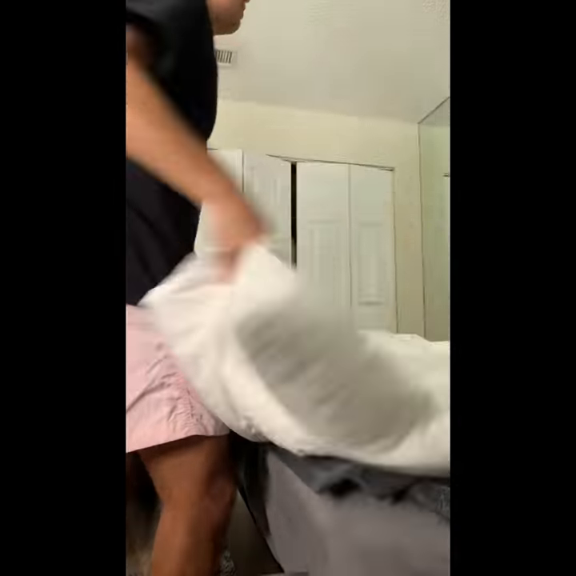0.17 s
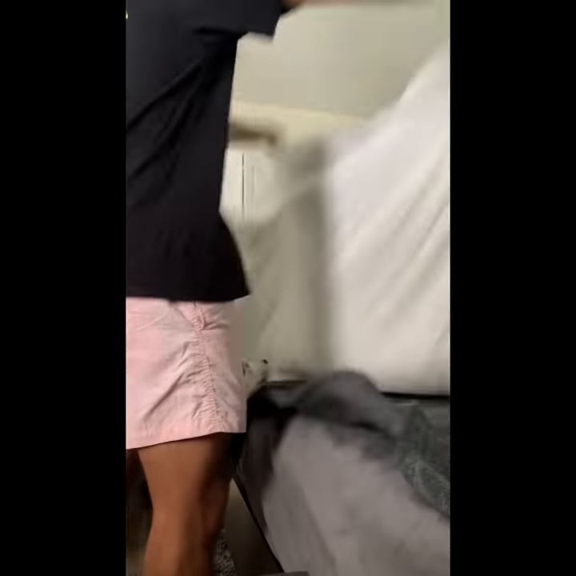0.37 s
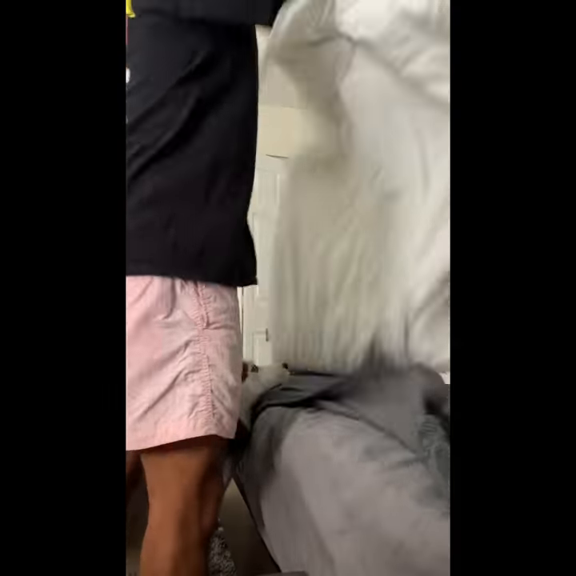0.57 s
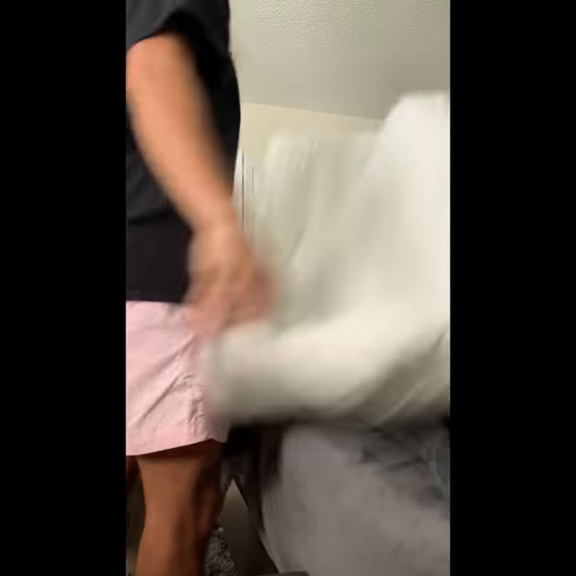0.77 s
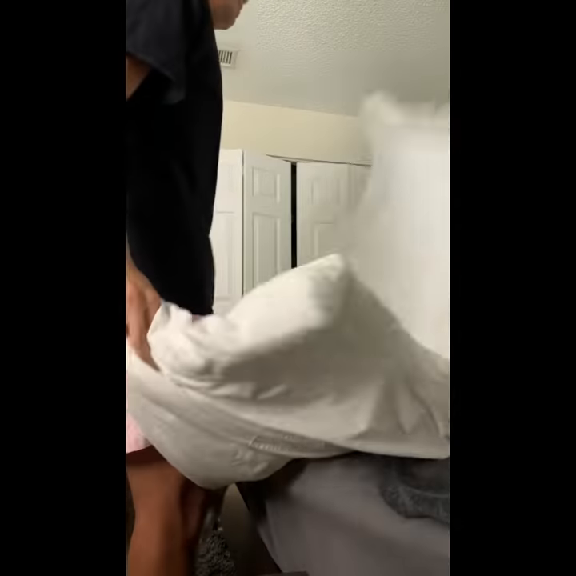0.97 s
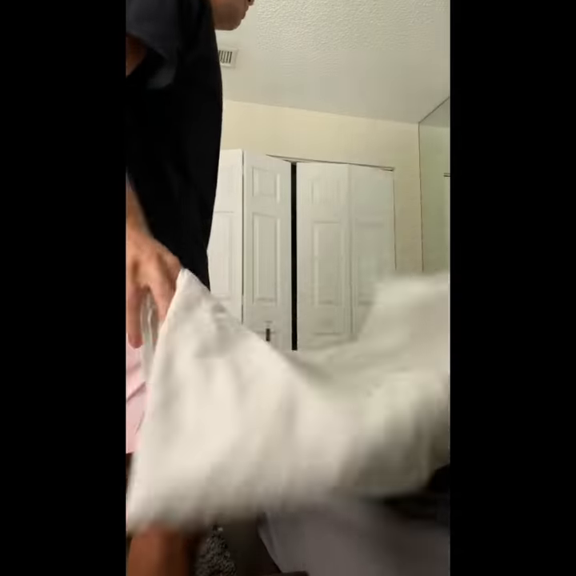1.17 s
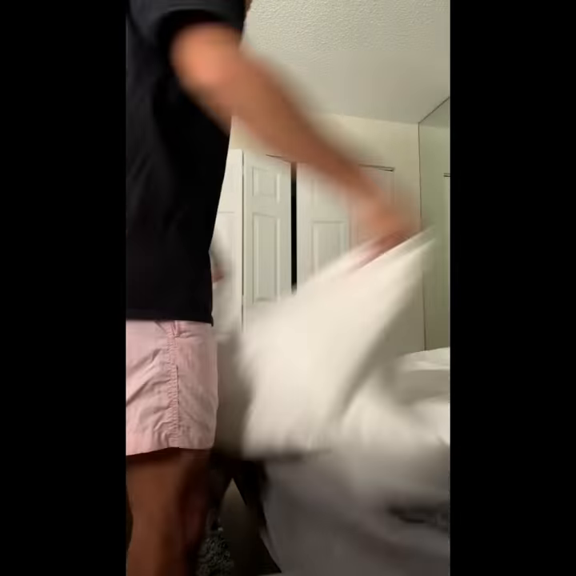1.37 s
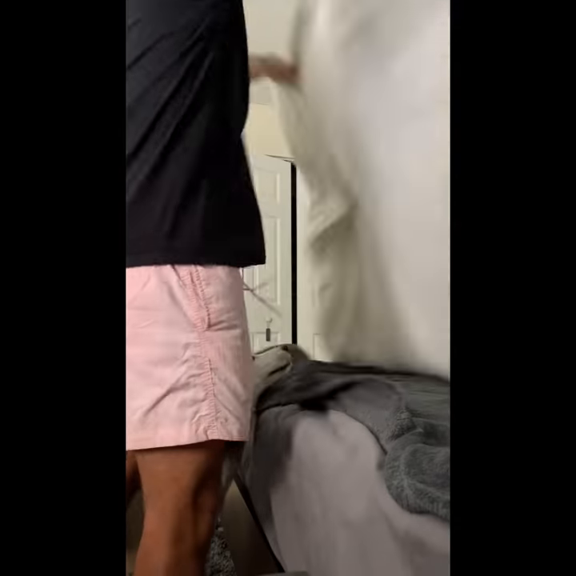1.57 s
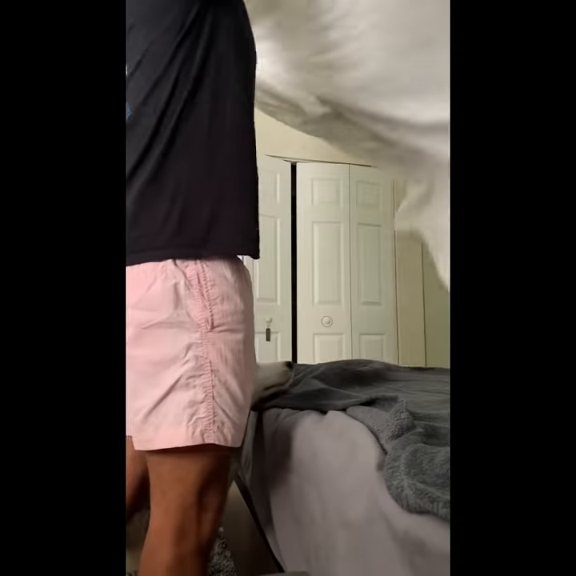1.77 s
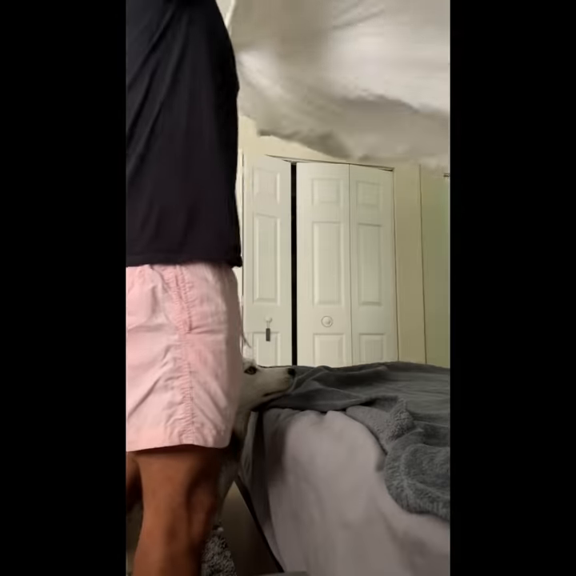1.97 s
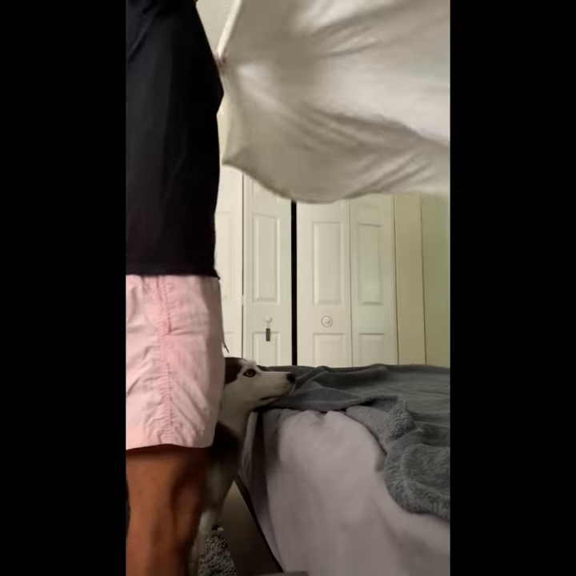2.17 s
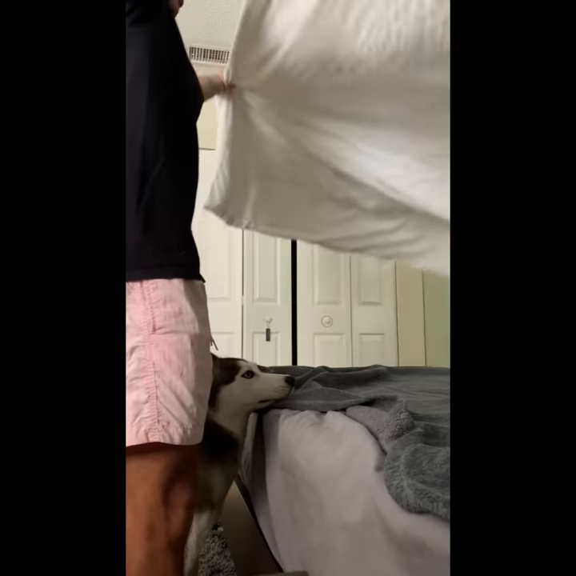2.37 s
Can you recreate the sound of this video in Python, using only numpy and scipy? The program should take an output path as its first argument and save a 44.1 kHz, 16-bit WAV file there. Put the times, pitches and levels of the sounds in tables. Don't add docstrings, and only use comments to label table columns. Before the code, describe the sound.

A heavy blanket is shaken out over a bed, flapping and thumping softly in a small bedroom

```python
import sys
import numpy as np
from scipy import signal
from scipy.fft import rfft, irfft
from scipy.io import wavfile
from scipy.ndimage import uniform_filter1d

SR = 44100
rng = np.random.default_rng(int(sys.argv[2]) if len(sys.argv) > 2 else 0)


def unload_audio(sound):
    columns = np.transpose(np.atleast_2d(sound))
    steps = np.round(np.clip(columns, -1, 1) * 32767)
    wavfile.write(sys.argv[1], SR, steps.astype(np.int16))


def field_ratio(decibels):
    return 10 ** (np.asarray(decibels, dtype=float) / 20)


N = 105840
EDGE = 4096


def level(x, db):
    return x * field_ratio(db) / np.sqrt(np.mean(x ** 2))


def read(table, hz):
    table = np.array(table)
    return np.interp(np.log(hz + 1), np.log(table[:, 0]), table[:, 1])


def over_time(table, column=1):
    table = np.array(table)
    return np.interp(np.arange(N) / SR, table[:, 0], table[:, column])


def walk(rate):
    hold = int(SR / rate)
    steps = np.repeat(rng.standard_normal(N // hold + 1), hold)
    return 0.943 * uniform_filter1d(uniform_filter1d(steps, hold), hold)[:N]


def texture(x, table, flicker_db, rate):
    hz = np.fft.rfftfreq(N, 1 / SR)
    inside = (hz > table[0][0] * 0.7) * (hz < table[-1][0])
    spec = rfft(x) * field_ratio(read(table, hz)) * inside
    out = 0
    for centre_hz in 22 * 2 ** (np.arange(20) / 2):
        bell = np.clip(1 - 2 * abs(np.log2((hz + 1) / centre_hz)), 0, 1)
        out = out + irfft(spec * bell, N) * field_ratio(flicker_db * walk(rate))
    return level(out, 0)


def folds(rate, spread_db, share):
    chance = rng.random((3, N))
    size_db = -spread_db * np.log(chance[2] + 0.029)
    pops = (chance[0] < rate / SR) * np.sign(chance[1] - 0.5) * field_ratio(size_db)
    return share * level(pops, 0) + (1 - share) * rng.standard_normal(N)


def filtered(x, response):
    wide = np.pad(x, EDGE, "reflect")
    hz = np.fft.rfftfreq(len(wide), 1 / SR)
    return irfft(rfft(wide) * response(hz), len(wide))[..., EDGE:-EDGE]


# t/s, level/dB
HUM_SWELL = [
    (0, -37),
    (.6, -35),
    (1.25, -40),
    (1.9, -43),
    (2.04, -57),
    (2.14, -43.5),
    (2.28, -42.5),
    (2.4, -58),
]
# f/Hz, level/dB
ROOM_NOISE = [(30, -28), (60, 2), (110, -32), (230, -23), (480, -62), (900, -46), (2000, -56), (5000, -54),
              (15800, -41.5)]


def house():
    hum_hz = 58.9 * (1 + 0.0199 * walk(4.92))
    hum = np.sqrt(2) * np.sin(2 * np.pi * np.cumsum(hum_hz) / SR)
    hum_db = over_time(HUM_SWELL) + 1.5 * walk(7.9)
    noise = texture(rng.standard_normal(N), ROOM_NOISE, flicker_db=0.0, rate=6)
    return hum * field_ratio(hum_db) + level(noise, -57)


# t/s, level/dB, centre f/Hz, length/s
SCUFF_HITS = [(0.013, -56.5, 800, .01), (.04, -54, 850, 0.0073), (0.115, -58.5, 1680, 0.049),
              (.215, -47, 1800, .002), (0.225, -37, 686, 0.01), (0.287, -38, 600, 0.0055),
              (0.314, -39.5, 860, 0.0086), (0.363, -42, 614, 0.0049), (0.393, -51.5, 3430, 0.057),
              (0.401, -42, 1389, .008), (0.428, -48.5, 2000, 0.031), (0.564, -49, 1570, 0.02),
              (0.587, -27, 480, 0.0088), (.594, -32, 1435, 0.0026), (.603, -31.5, 1850, 0.0039),
              (.604, -44.5, 4560, 0.0062), (.61, -36, 1350, .004), (.612, -27.5, 800, 0.0035),
              (0.632, -34, 480, 0.053), (0.687, -32, 160, 0.022), (.748, -40.5, 1670, 0.015),
              (0.72, -35, 1134, 0.0046), (0.77, -38, 620, 0.0042), (.964, -48, 3300, 0.0023),
              (.965, -35.5, 1290, .0032), (1.176, -59, 4500, 0.0031), (1.257, -54, 900, .02),
              (1.327, -54.5, 6450, 0.03), (1.334, -41.5, 700, 0.006), (1.34, -50, 2700, .003),
              (1.356, -40.5, 1111, 0.019), (1.406, -42, 1790, 0.0017), (1.418, -41.5, 1890, 0.0026),
              (1.419, -48, 3700, .002), (1.42, -46.5, 1570, 0.044), (1.44, -41, 6700, 0.004),
              (1.444, -34, 694.4, 0.0062), (1.482, -41.5, 3760, 0.022), (1.511, -35, 695, .004),
              (1.514, -40, 1190, 0.0035), (1.528, -49, 3300, 0.03), (1.543, -33, 283, 0.024),
              (1.759, -54.5, 780, 0.011), (1.941, -43.5, 214, .044), (1.7, -58, 850, 0.058),
              (2.02, -61, 950, 0.062), (2.06, -68.5, 1728, .03), (2.284, -60, 900, 0.046),
              (2.293, -56, 302, 0.049)]


def scuffs():
    width, rise = 0.53, 0.66
    t, hz, out = np.arange(N) / SR, np.fft.rfftfreq(N, 1 / SR), np.zeros(N)
    noise = rfft(rng.standard_normal(N))
    for at, db, centre_hz, length in SCUFF_HITS:
        band = np.exp(-(np.log((hz + 1) / centre_hz) / width) ** 2)
        puff = irfft(noise * band, N)
        shape = np.exp(-((t - at) / length / np.where(t < at, rise, 1)) ** 2)
        even = np.sqrt(np.sum(shape ** 2) / np.sum((shape * puff) ** 2))
        out += field_ratio(db) * shape * puff * even
    return out


# t/s, peak level/dB, pitch f/Hz, length/cycles
THUMP_HITS = [(.168, -28.5, 610, 0.97), (.173, -28.5, 250, 1.74), (.214, -19.5, 740, 2.1),
              (.222, -24, 233, 1.9), (.434, -13, 98, 1.4), (0.436, -24, 55, 1.2), (0.461, -24, 200, 1.5),
              (.587, -19, 300, 4.2), (.6, -14, 270, 2.5), (.603, -15.5, 750, 2.4), (.607, -12, 306, 1.55),
              (.62, -22, 150, 1), (.64, -22.5, 450, 3), (.812, -19, 115, 0.88), (.842, -25, 100, 1.7),
              (.86, -23.5, 140, 2.4), (.861, -25, 50, 1.5), (.866, -20.5, 373, 3.2), (.891, -17, 178, 1.52),
              (.902, -22, 390, 2), (.93, -21.5, 101, 1.5), (0.949, -20, 130, 1.3), (.966, -15, 470, 1.6),
              (.976, -9, 100.7, 1.88), (1.012, -21.5, 100, 1.7), (1.059, -29, 540, 1.2),
              (1.074, -27.5, 520, 4.8), (1.088, -22, 90, 1.3), (1.106, -24.5, 113, 2.3),
              (1.172, -29, 100, 2), (1.212, -33.5, 200, 1.3), (1.407, -24, 900, 2.2),
              (1.414, -22.5, 114, 1.1), (1.444, -21.5, 102, 2.3), (1.47, -22, 130, 1.2),
              (1.491, -20.5, 71.5, 0.96), (1.531, -23, 105.6, 1.4), (1.615, -25, 150, 1.1),
              (1.664, -33.5, 107, 3.3), (1.758, -26.5, 195, 2.6), (1.922, -34.5, 128, 1.9),
              (1.954, -32, 98, 1.3), (2.13, -46, 130, 2.6), (2.382, -38.5, 290, 3), (2.392, -38, 110, 1.2)]


def thumps():
    sag, ring_out = 0.074, 1.39
    t, out = np.arange(N) / SR, np.zeros(N)
    for at, db, hz, cycles in THUMP_HITS:
        turns = (t - at) * hz
        near = abs(turns) < 3 * cycles
        u = turns[near]
        shape = np.exp(-(2.81 * u / cycles / np.where(u > 0, ring_out, 1)) ** 2)
        out[near] += field_ratio(db) * shape * np.cos(2 * np.pi * u * (1 - sag * u / cycles))
    return out


# t/s, flap level/dB, air push relative to flap/dB
SHAKE_MOVES = [(0, -59.5, 9.5), (.14, -53, 5), (.22, -39, 5), (.35, -36, 4), (0.431, -27.5, -1),
               (0.56, -44.5, 6), (0.604, -26, 3), (0.742, -38.5, -1.5), (0.823, -29, 4.5), (.97, -33.5, 7),
               (1.1, -39, 11), (1.309, -54, 7.5), (1.36, -37, 5), (1.49, -35.5, 7.5), (1.801, -56.5, 15.5),
               (2.08, -66.5, 13), (2.2, -74, 21), (2.4, -48, 4.5)]
# t/s, level/dB
SLIDE_MOVES = [(0, -63), (.13, -61.5), (.3, -52.5), (.42, -44.5), (.53, -59.5), (.61, -46.5), (.7, -50.5),
               (.97, -52), (1.02, -60), (1.3, -62), (1.35, -51.5), (1.41, -51.5), (1.51, -42.5),
               (1.74, -65), (2.08, -69), (2.13, -74.5), (2.24, -75.5), (2.28, -68)]
# f/Hz, level/dB
FLAP_COLOUR = [(88, -70), (150, -2), (395, -8.5), (438, -7.5), (579, -13.5), (721, -12), (912, -16),
               (3080, -39), (5000, -71.5), (6500, -92), (11000, -120)]
# f/Hz, level/dB
AIR_COLOUR = [(25, -34), (42, 1.5), (92, -1.5), (124, -2.5), (168, -17), (194, -15), (227, -9.5),
              (300, -16), (390, -40), (660, -120)]
# f/Hz, level/dB
SLIDE_COLOUR = [(600, 5.5), (1700, 6), (4300, 1.5), (7300, -5.5), (8800, -8), (11100, -9), (13300, -9.5),
                (15800, -7.5)]


def blanket():
    flap_db, air_db = over_time(SHAKE_MOVES, 1), over_time(SHAKE_MOVES, 2)
    slide_db = over_time(SLIDE_MOVES)
    gust = walk(21.99)
    flap = texture(folds(700, 2, 0.52), FLAP_COLOUR, flicker_db=1.8, rate=26)
    air = texture(folds(60, 0.92, 0.35), AIR_COLOUR, flicker_db=3.0, rate=14.07)
    slide = texture(folds(3000, 1.9, 0.44), SLIDE_COLOUR, flicker_db=-0.5, rate=12.87)
    sheen = signal.sosfilt(signal.butter(2, 6950, "high", fs=SR, output="sos"), slide)
    slide = slide + sheen * field_ratio(-3.5 + 2 * (slide_db + 45.5))
    shaken = flap * field_ratio(1.5 + 1.04 * gust) + air * field_ratio(-1.5 + air_db + 0.36 * gust)
    return field_ratio(flap_db) * shaken + slide * field_ratio(4.5 + slide_db + 1.7 * gust)


# f/Hz, width/Hz, lift/dB
MODES = [
    (62, 10.7, 4),
    (90, 25, 0.5),
    (190, 15, 2),
    (269, 10, 1),
    (467.4, 11, 3),
]


def room(x):
    t60_s, tail_db = 0.15, -13.5
    t = np.arange(SR // 3) / SR
    tail = rng.standard_normal(len(t)) * field_ratio(-60 * t / t60_s) * (t > 0.004)
    tail = tail / np.sqrt(np.sum(tail ** 2))
    wet = x + field_ratio(tail_db) * signal.fftconvolve(x, tail)[:N]

    def resonance(hz):
        return 1 + sum((field_ratio(db) - 1) / (1 + 2j * (hz - mode_hz) / width) for mode_hz, width, db in MODES)

    return filtered(wet, resonance)


# f/Hz, lag/rad
PORT_LAG = [(40, -.02), (450, -.3), (1500, .1), (3600, 1.1), (4850, 3.14), (6900, 6.28), (9120, 9.42),
            (17400, 22)]
# f/Hz, share
PORT_LOOSE = [(100, 0.011), (300, 0.2), (800, 0.33), (1800, 0.52), (3600, 0.49), (4800, 0.16), (7000, 0.17),
              (15000, 0.043)]
# f/Hz, level/dB
PORT_LEAN = [(60, 0.4), (150, 0.24), (330, 1.3), (600, -0.85), (1400, 0.2), (3000, 0)]


def ports(hz):
    lag = np.interp(hz, *np.array(PORT_LAG).T)
    loose = np.clip(read(PORT_LOOSE, hz), 0, 0.7)
    t = np.arange(EDGE) / SR
    scatter = rfft(rng.standard_normal(len(t)) * np.exp(-t / 0.04), 2 * len(hz) - 2)
    same = np.sqrt(1 - loose ** 2)
    other = loose * scatter / abs(scatter)
    left = (same + other) * field_ratio(read(PORT_LEAN, hz))
    right = (same - other) * np.exp(-1j * lag)
    low_cut = hz ** 2 / (hz ** 2 + 30.3 ** 2)
    return np.array([left, right]) * low_cut


def scene():
    cloth = room(blanket() + thumps() + scuffs())
    return filtered(cloth + house(), ports)


def roll_off(x):
    return signal.sosfilt(signal.butter(12, 16730, fs=SR, output="sos"), x)


def record(dry):
    return roll_off(dry)


dry = scene()
out = record(dry)
unload_audio(out)
```